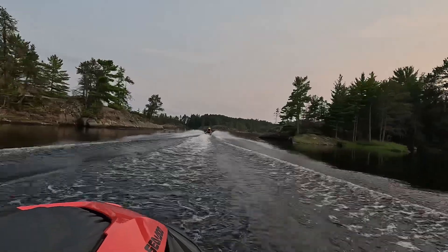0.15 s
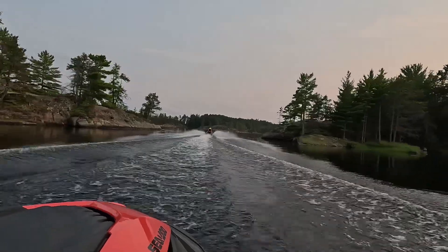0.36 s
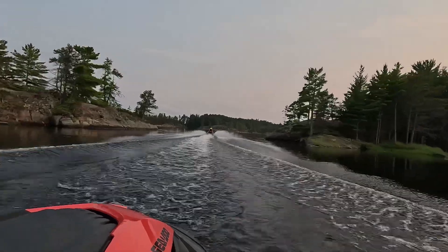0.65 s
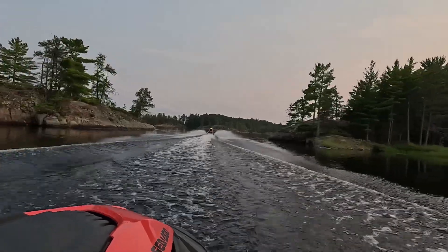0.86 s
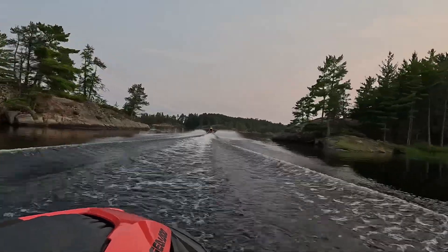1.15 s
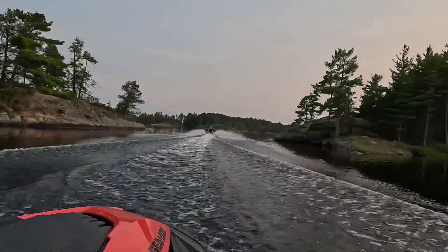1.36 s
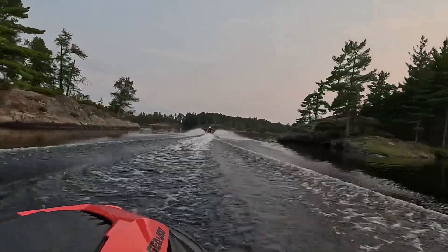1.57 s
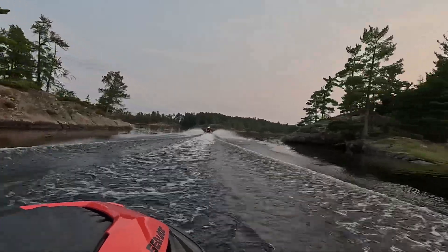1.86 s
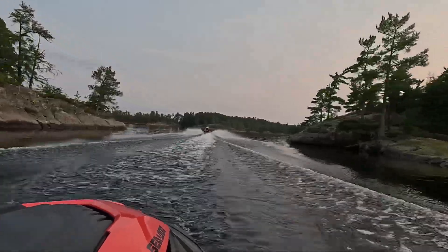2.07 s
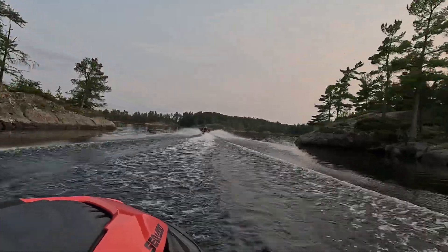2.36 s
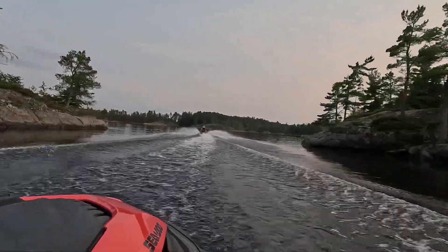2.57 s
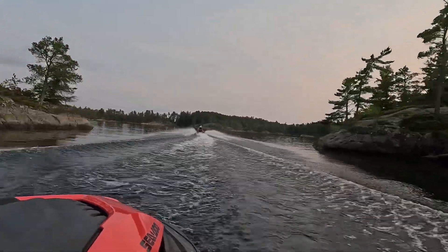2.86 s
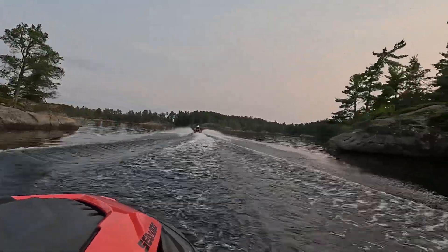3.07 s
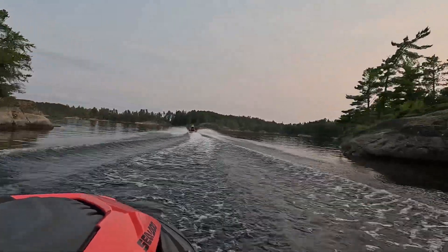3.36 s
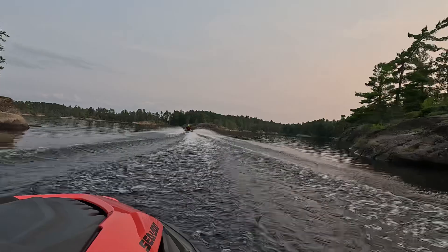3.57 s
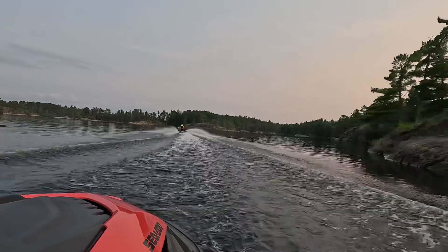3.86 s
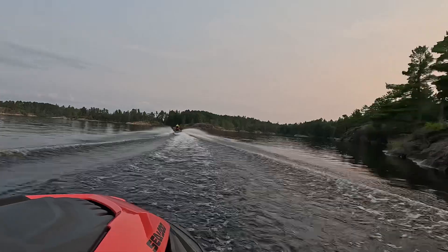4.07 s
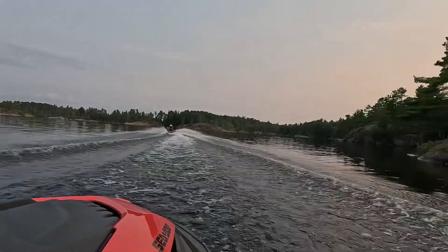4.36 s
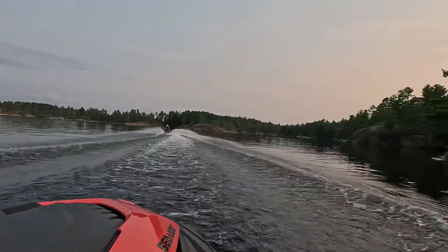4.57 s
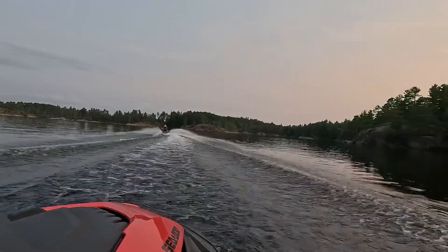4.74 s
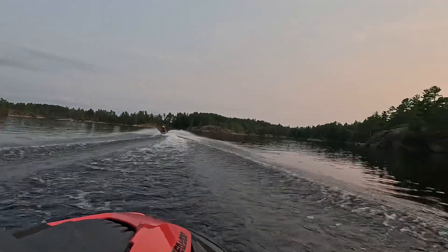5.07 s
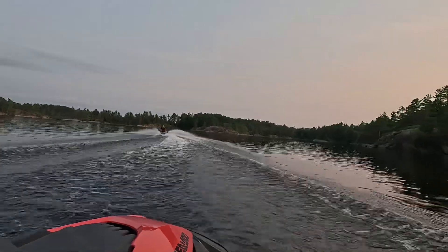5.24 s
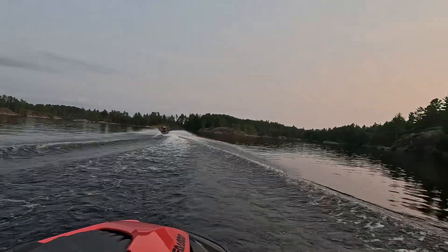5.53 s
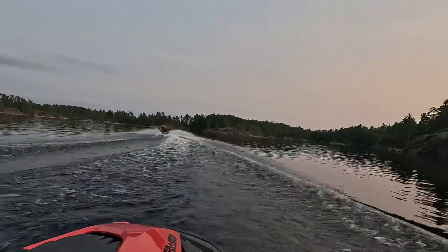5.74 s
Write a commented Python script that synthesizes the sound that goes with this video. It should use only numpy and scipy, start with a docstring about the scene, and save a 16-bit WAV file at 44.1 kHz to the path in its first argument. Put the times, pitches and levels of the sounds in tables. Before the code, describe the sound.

Heard from on board, a cruising personal watercraft hums through churning wake and gusty wind, its pitch dipping twice as ripples slap the hull.

```python
"""A personal watercraft cruises over a lake, heard from on board. From the start its three-cylinder
four-stroke drones through the hull over the roar of the jet and the hiss of the wake; three ripples
slap the hull and wind begins to buffet the microphone. Near 2 s the throttle eases and the drone sags,
then climbs back. Just after 4 s it eases again, and picks up towards the end under two last slaps.
A limiter holds the peaks throughout."""
import sys
import numpy as np
from scipy import signal
from scipy.fft import rfft, irfft
from scipy.io import wavfile
from scipy.ndimage import uniform_filter1d, minimum_filter1d

SR = 44100
rng = np.random.default_rng(int(sys.argv[2]) if len(sys.argv) > 2 else 0)


def inscribe(sig):
    """Save sig as 16-bit PCM at rate SR to the path in sys.argv[1].

    A 1-D sig is mono; a 2-D sig holds one channel per row.
    Samples are clipped to [-1, 1] before scaling.
    """
    pcm = np.round(np.clip(np.atleast_2d(sig).T, -1, 1) * 32767)
    wavfile.write(sys.argv[1], SR, pcm.astype(np.int16))


N = 260190
T = np.arange(N) / SR

# engine speed: (time [s], four-stroke cycle rate [Hz])
ENGINE_SPEED = [(0, 43.35), (0.44, 43.28), (0.62, 42.58), (1.03, 42.61), (1.22, 43.4), (1.63, 43.44),
                (1.95, 41.7), (2.21, 38.49), (2.52, 38.9), (2.8, 40.3), (3.35, 41.04), (3.55, 41.86),
                (3.84, 41.75), (3.98, 40.42), (4.14, 36.67), (4.4, 36.35), (4.58, 38.05), (4.88, 39.09),
                (5.13, 38.14), (5.5, 38.6), (5.62, 39.33), (5.76, 41.32), (5.9, 41.6)]
# the loud tones, 3, 6 and 12 from the firing, 4 from the shaft, 8 from the exhaust: (order [x cycle rate], base
# level [dB], flutter [dB])
DRONE_TONES = [(3, -25, 0.96), (4, -24.5, 1.83), (6, -27, 1.0), (8, -24.5, 1.5), (12, -51, 2.5)]
# hull resonances that make a passing tone bloom: (frequency [Hz], width [Hz], lift [dB])
HULL_BOOMS = [(235.1, 19.3, 7.5), (246.8, 14, 2.5), (337.7, 20, 1.5), (447.7, 50, 19.5)]
# fader ride on the exhaust drone at eight times the cycle rate, which dips each time the throttle eases: (time
# [s], gain [dB])
HUM_RIDE = [(0, 1.5), (1.55, -2), (1.95, 3), (2.3, -7.5), (2.85, 2.5), (3.95, 3), (4.25, -9.5), (4.6, -2),
            (4.88, -2), (5.3, 6), (5.7, -2.5)]
# filler tones from unequal cylinders: (order [x cycle rate], eased level [dB], cruise level [dB])
BURBLE_TONES = [(2, -32.5, -42), (5, -38.5, -33.5), (7, -37.5, -35), (9, -26.5, -54.5), (10, -42, -41),
                (11, -52.5, -37), (13, -41, -63), (14, -43.5, -44), (15, -43.5, -52), (16, -47, -42),
                (17, -45.5, -45.5), (19, -54.5, -47), (22, -53.5, -52), (24, -55, -54.5),
                (31, -54.5, -58.5)]
# ring of the engine casing: (frequency [Hz], width [Hz], rms level [dB])
CASING_RINGS = [(1220, 190, -55.5), (2750, 160, -58), (4560, 200, -67.5)]
# EQ curves for the hollow hull, churned water, spray and mist: (frequency [Hz], relative level [dB])
HULL_EQ = [(40, -33.5), (110, 3.5), (170, -2), (210, 1), (250, 0), (320, 0.5), (375, -4.5), (440, -3),
           (510, -16.5), (700, -33), (3000, -77)]
CHURN_EQ = [(200, -19.5), (450, 2.5), (540, -1), (700, -0.5), (790, -3), (880, -8.5), (1050, -10.5),
            (1250, -12), (1400, -15.5), (1900, -20.5), (2500, -30), (6000, -50), (14000, -85)]
SPRAY_EQ = [(400, -17.5), (1200, 7), (1900, 4.5), (2450, -2), (3200, -1.5), (4200, -8), (5300, -14.5),
            (7000, -22.5), (13000, -59)]
MIST_EQ = [(2500, -24.5), (5000, 2.5), (6800, -2.5), (8500, -1.5), (10200, -9), (11200, -17.5),
           (12000, -18.5), (13000, -33), (14400, -41)]
# base levels of the water at the stern: (time [s], churn [dB], spray [dB], mist [dB])
WAKE_LEVELS = [(0, -29, -44.5, -59), (0.6, -31, -46.5, -64), (1.8, -31.5, -46.5, -62.2),
               (2.6, -32.5, -46.5, -62.5), (3.5, -34, -47.5, -63), (4.0, -33, -48, -62.7),
               (4.3, -30.5, -44, -60), (4.65, -29.5, -42.5, -60.5), (5.2, -32, -47, -63),
               (5.9, -31.5, -45.5, -58.5)]
# the hull cuts a wave and throws up a sheet of spray: (centre [s], length [s], lift [dB])
SPRAY_SHEETS = [(.8, 0.21, 2.5), (1.3, 0.46, 1.5), (1.78, 0.32, 2), (2.32, 0.43, 1.5), (2.7, 0.23, 0.5),
                (3.84, 0.2, 2), (4.6, 0.13, 0.5)]
# ripples hitting the hull: (time [s], envelope peak [dB])
RIPPLE_HITS = [(0.226, -26), (0.343, -25), (0.509, -23.5), (2.275, -24.5), (3.199, -29), (5.259, -34),
               (5.747, -25)]
# EQ curve for the wind rumble: (frequency [Hz], relative level [dB])
WIND_EQ = [(5, -6), (20, -6), (40, -2), (65, -1), (90, -2.5), (130, -11), (250, -14.5), (1000, -52),
           (4000, -89.5)]
# gusts at the microphone: (centre [s], length [s], lift [dB])
WIND_GUSTS = [(.57, 0.19, 7.5), (1.12, 0.49, 7.5), (1.45, 0.29, 6), (2.19, 0.29, 9.5), (2.51, 0.21, 7.5),
              (2.88, 0.54, 8.5), (3.53, 0.38, 8.5), (4.57, .15, 6), (4.85, 0.31, 5.5), (5.79, .15, 9)]
# lulls in the wind: (centre [s], length [s], drop [dB])
WIND_LULLS = [(.79, 0.19, 9), (3.96, 0.35, 7), (5.6, 0.58, 6)]


def drone(cycles, flutter_hz=7.7, smear_cycles=0.00094, hum_order=8):
    """The lead voice: clean exhaust and shaft tones bloom as they slide through the hull's resonances."""
    speed_hz, = curves(ENGINE_SPEED)
    hum_db, = curves(HUM_RIDE)
    out = np.zeros(N)
    for order, base_db, flutter_db in DRONE_TONES:
        boom_db = sum(lift / (1 + (2 * (order * speed_hz - hz) / width) ** 2)
                      for hz, width, lift in HULL_BOOMS)
        level_db = base_db + boom_db + (order == hum_order) * hum_db + flutter_db * wander(flutter_hz)
        out += gain_of(level_db) * partial(cycles + smear_cycles * wander(14), order)
    return out


def burble(cycles, waver_db=1.0, smear_cycles=0.03):
    """Softer tones shift with the throttle and waver as water washes over the exhaust outlet."""
    opening = throttle()
    out = np.zeros(N)
    for order, eased_db, cruise_db in BURBLE_TONES:
        level_db = eased_db + opening * (cruise_db - eased_db) + waver_db * wander(3.5)
        tone = partial(cycles + smear_cycles * wander(9) / order, order)
        out += gain_of(level_db + churning_db()) * tone
    return out


def clatter(cycles, throttle_db=2.0):
    """Each firing rings the engine casing, harder as the throttle opens."""
    knocks = noise() * throb(cycles, depth=1.8) * gain_of(throttle_db * (throttle() - 1))
    out = np.zeros(N)
    for hz, width, db in CASING_RINGS:
        pole = np.exp((2j * np.pi * hz - np.pi * width) / SR)
        ring = signal.lfilter([1], np.poly([pole, pole]), knocks).real
        out += gain_of(db) * unit_rms(ring)
    return out


def crank(jitter=0.0015):
    """The running count of engine cycles; the load on the impeller makes the speed tremble."""
    speed_hz, = curves(ENGINE_SPEED)
    return np.cumsum(speed_hz * (1 + jitter * wander(9))) / SR


def throttle(eased_hz=37, cruise_hz=43):
    """Throttle opening, following engine speed: about 0 when eased, about 1 at full cruise."""
    speed_hz, = curves(ENGINE_SPEED)
    return (speed_hz - eased_hz) / (cruise_hz - eased_hz)


def throb(cycles, depth, sharpness=2.1, cylinders=(1, 0.57, 0.19)):
    """The firing pulse as an envelope: three bursts a cycle, one cylinder louder than the others."""
    bursts = sum(size * np.exp(sharpness ** 2 * (np.cos(2 * np.pi * (cycles - k / len(cylinders))) - 1))
                 for k, size in enumerate(cylinders))
    return unit_rms(1 + depth * bursts)


def hull_roar(cycles, base_db=-21.5):
    """The body of the sound: the jet pump and rushing water make the hollow hull roar."""
    roar = equalised(noise() * throb(cycles, depth=0.58), HULL_EQ)
    return gain_of(base_db + churning_db()) * roar


def churning_db(share=0.43):
    """Gain ride from the churn at the stern, which roughens the exhaust and shakes the hull."""
    churn_db = curves(WAKE_LEVELS)[0]
    return share * (churn_db - churn_db.mean())


def wake(cycles, spray_trim_db=1.74, mist_trim_db=1.94, drop_gain=0.6):
    """Churn, spray and mist flutter with one shared splash; exhaust pulses beat the churn and spray."""
    churn_db, spray_db, mist_db = curves(WAKE_LEVELS) + swells_db(SPRAY_SHEETS)
    splash_db = unit_rms(wander(22) + 0.54 * wander(86))
    churn = equalised(noise() * throb(cycles, depth=0.24), CHURN_EQ)
    pulsing_hiss = noise() * throb(cycles, depth=0.22)
    spray = equalised(pulsing_hiss + drop_gain * drops(per_s=1800, spread_db=2.5), SPRAY_EQ)
    mist = equalised(noise() + drop_gain * drops(per_s=3400, spread_db=4.0), MIST_EQ)
    return (gain_of(churn_db + 0.9 * splash_db) * churn
            + gain_of(spray_db + spray_trim_db + 1.06 * splash_db) * spray
            + gain_of(mist_db + mist_trim_db + 0.7 * splash_db) * mist)


def drops(per_s, spread_db):
    """A patter of droplet clicks, many small and a few large."""
    sizes = gain_of(spread_db * np.minimum(rng.exponential(1, N), 4))
    return unit_rms(sizes * np.sign(noise()) * (rng.random(N) < per_s / SR))


def slaps(attack_s=0.0025, spray_db=-17.0):
    """Each ripple lands as a short burst of churn and spray with a thump from the hollow hull."""
    envelope = np.zeros(N)
    for peak_s, db in RIPPLE_HITS:
        age = np.maximum(T - peak_s + attack_s, 0) / attack_s
        envelope += gain_of(db) * age * np.exp(1 - age)
    churn = equalised(noise(), CHURN_EQ)
    thump = equalised(noise(), HULL_EQ)
    spray = equalised(noise(), SPRAY_EQ)
    return envelope * (churn + thump + gain_of(spray_db) * spray)


def wind(base_db=-25.5, eddy_db=1.5, eddy_hz=23.0):
    """A low bed of eddies on the microphone, swelling in gusts and sinking in lulls."""
    level_db = base_db + swells_db(WIND_GUSTS) - swells_db(WIND_LULLS) + eddy_db * wander(eddy_hz)
    return gain_of(level_db) * equalised(noise(), WIND_EQ)


def gain_of(db):
    """Decibels to amplitude."""
    return 10 ** (np.asarray(db) / 20)


def unit_rms(x):
    """Normalises to rms 1."""
    return x / np.sqrt(np.mean(x ** 2) + 1e-20)


def curves(rows):
    """One automation curve for each value column of a timed table."""
    times, *columns = np.transpose(rows)
    return [np.interp(T, times, column) for column in columns]


def swells_db(rows):
    """A gain ride of smooth bumps, one for each row."""
    return sum(db * np.cos(np.pi * np.clip((T - centre_s) / length_s, -.5, .5)) ** 2
               for centre_s, length_s, db in rows)


def equalised(x, eq):
    """Runs x through an EQ curve and normalises to rms 1."""
    hz, db = np.transpose(eq)
    shape_db = np.interp(np.log(np.fft.rfftfreq(N, 1 / SR) + 1), np.log(hz), db)
    return unit_rms(irfft(rfft(x) * gain_of(shape_db), N))


def partial(cycles, order):
    """A sine at one multiple of the cycle rate, with random phase and rms 1."""
    return np.sqrt(2) * np.cos(2 * np.pi * (order * cycles + rng.random()))


def noise():
    """White noise of rms 1."""
    return rng.standard_normal(N)


def wander(rate_hz):
    """A smooth random modulator of rms 1, rolling off above the given rate."""
    hz = np.fft.rfftfreq(N, 1 / SR)
    band = hz / (hz + rate_hz / 10) / (1 + (hz / rate_hz) ** 4)
    return unit_rms(irfft(rfft(noise()) * band, N))


def scene():
    """The mono mix of engine, water and wind."""
    cycles = crank()
    engine = drone(cycles) + burble(cycles) + clatter(cycles)
    return (engine + hull_roar(cycles) + wake(cycles) + slaps() + wind())[None]


def record(dry, threshold_db=-6.8, slope=0.8, release_db_per_s=135.0, window_samples=128, top_hz=14400):
    """A look-ahead limiter ducks the mix at each peak and lets go quickly; a low-pass trims the top."""
    peak_db = 20 * np.log10(abs(dry[0]) + 1e-9)
    duck_db = slope * np.maximum(peak_db - threshold_db, 0)
    release_db = T * release_db_per_s
    gain_db = release_db - np.maximum.accumulate(duck_db + release_db)
    # hold and smooth the gain so that it fades down just ahead of the peak
    smooth_db = uniform_filter1d(minimum_filter1d(gain_db, window_samples), window_samples)
    low_pass = signal.firwin(511, top_hz, window=("kaiser", 9), fs=SR)
    return signal.oaconvolve(dry * gain_of(smooth_db), low_pass[None], "same")


dry = scene()
out = record(dry)
inscribe(out)
```